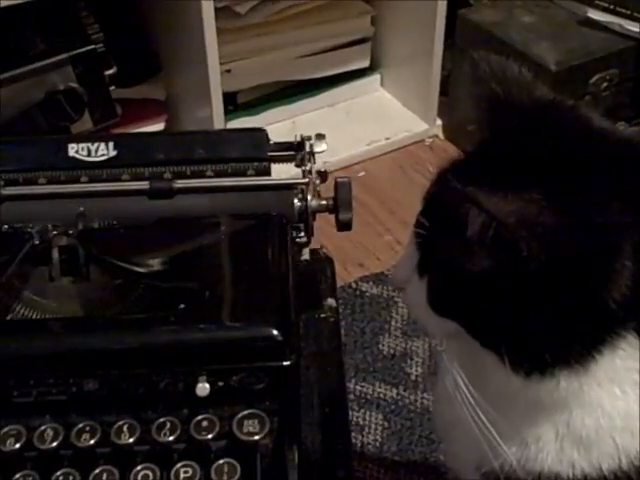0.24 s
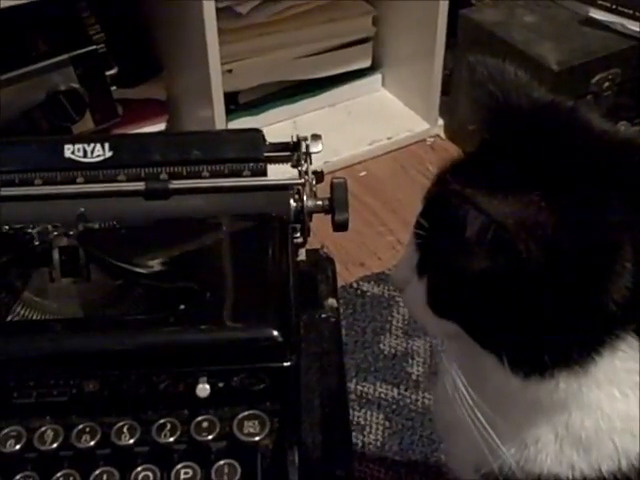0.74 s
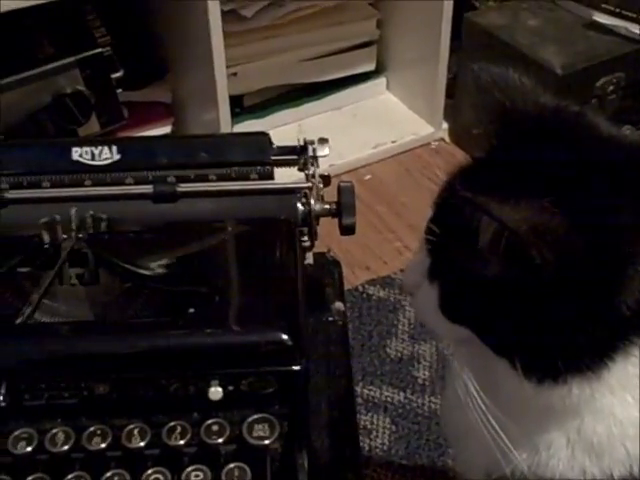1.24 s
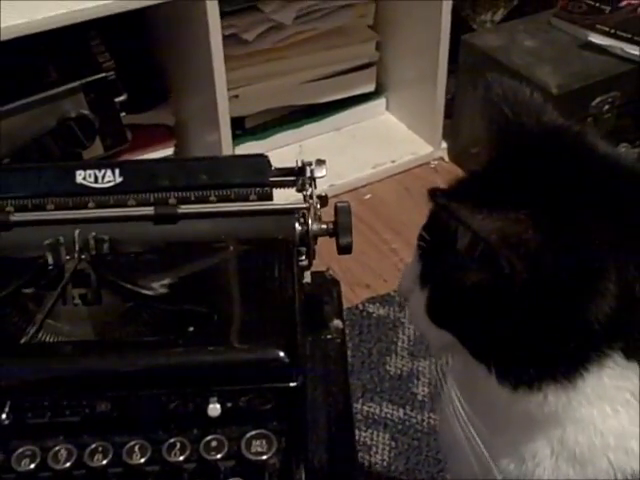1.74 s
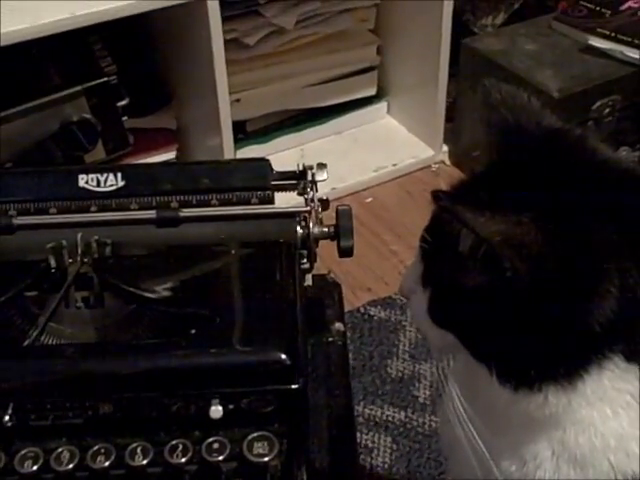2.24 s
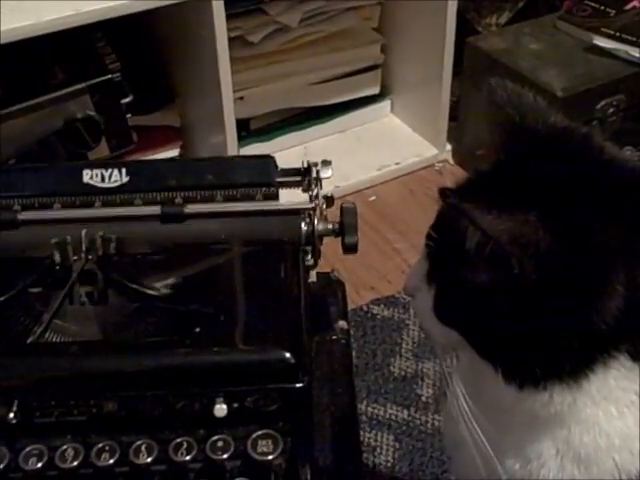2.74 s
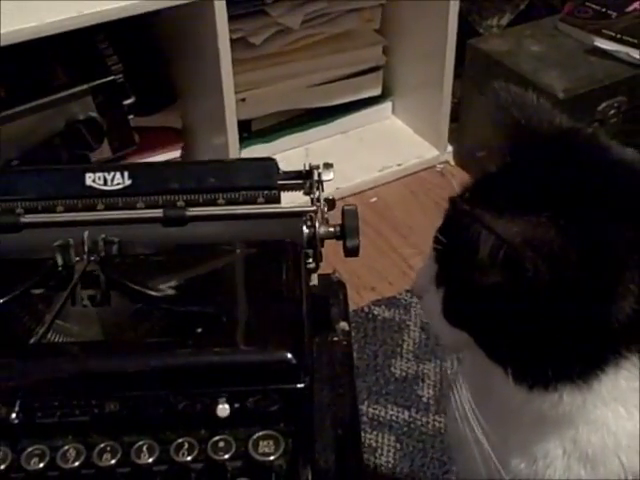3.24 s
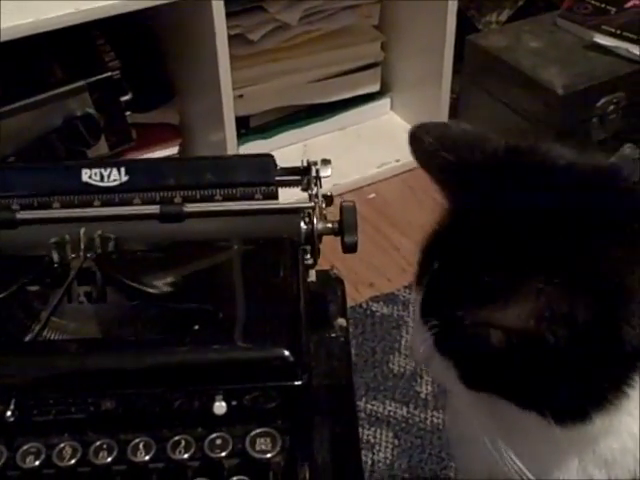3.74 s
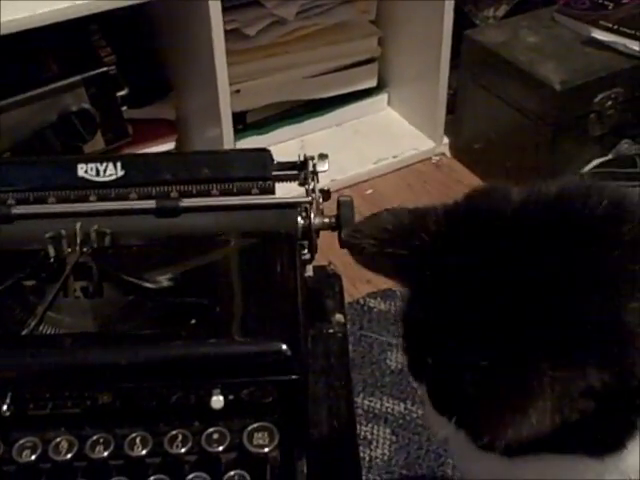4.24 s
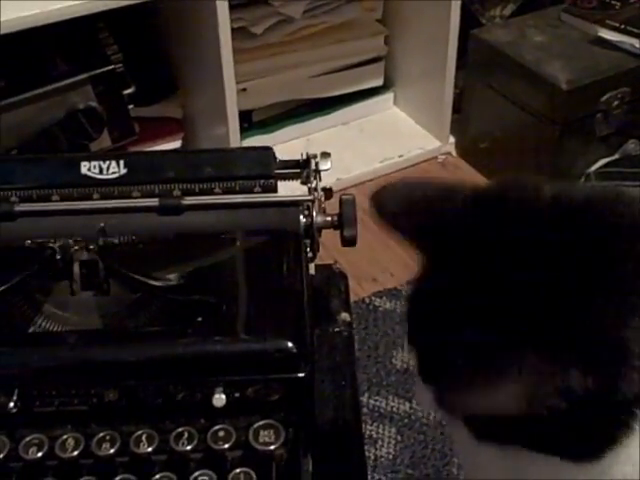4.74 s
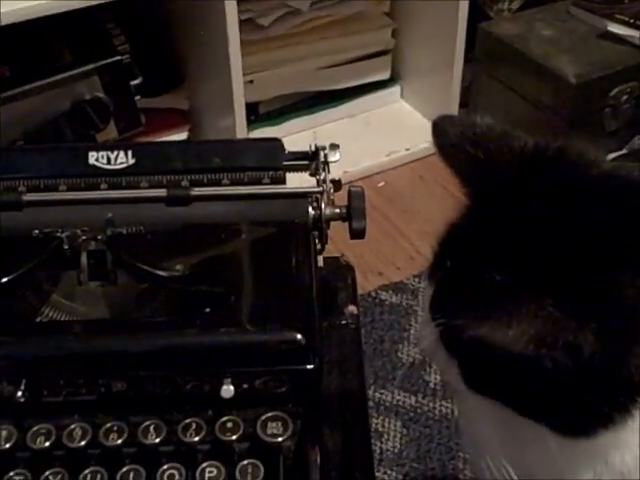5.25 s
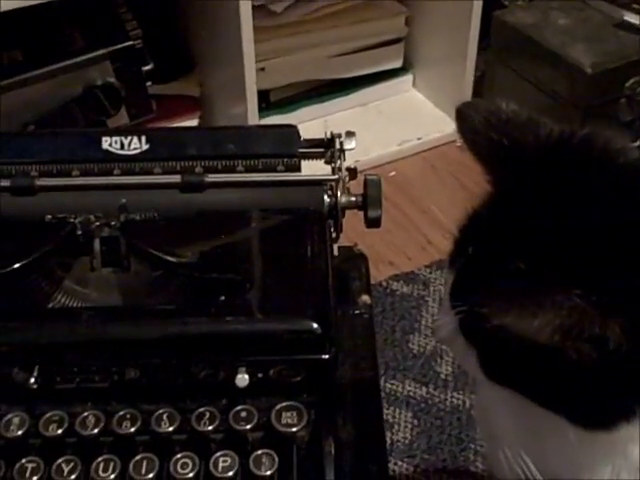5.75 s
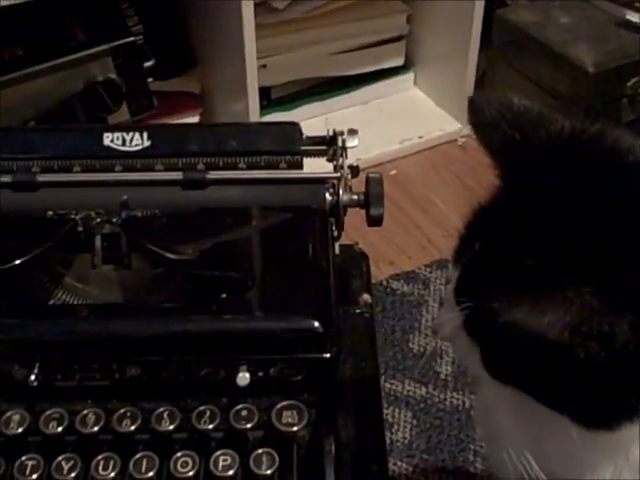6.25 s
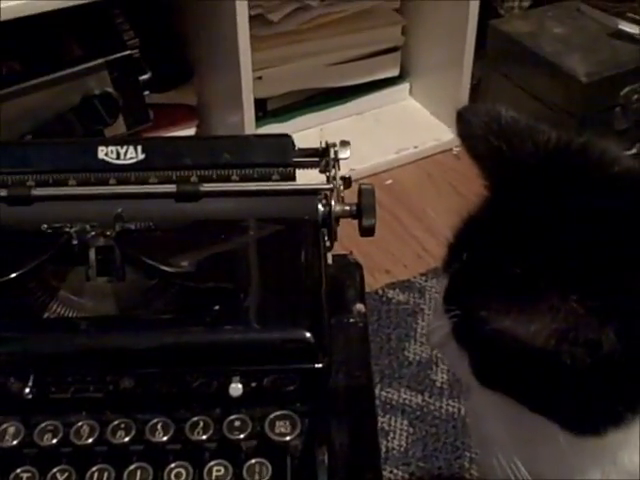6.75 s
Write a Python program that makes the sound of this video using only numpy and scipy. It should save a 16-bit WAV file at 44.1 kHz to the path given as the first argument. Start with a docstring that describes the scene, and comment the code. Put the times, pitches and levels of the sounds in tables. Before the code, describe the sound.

Close-up typewriter: quick hard metallic type slaps, a pause, irregular clattering half-strokes with dull thumps, faint cloth rustle, and a final bright rattle.

```python
"""The floor of a small, quiet room, where an old manual typewriter is pecked at with one hand.
Full strokes slap a type slug on the platen (noise bursts) and leave the steel ringing (fading sines);
half strokes only set the levers and type bars clattering (showers of tiny noisy contacts).
Each stroke thumps the frame into the floor; keys tap, springs ping, and a sleeve rustles in the pause.
Behind it all lie a steady hiss, a faint thin whine and soft low bumps."""
import sys
import numpy as np
from scipy import signal
from scipy.fft import rfft, irfft
from scipy.io import wavfile

SR = 44100
rng = np.random.default_rng(int(sys.argv[2]) if len(sys.argv) > 2 else 0)


def inscribe(sig):
    """Save sig as 16-bit PCM at rate SR to the path in sys.argv[1].

    A 1-D sig is mono; a 2-D sig holds one channel per row.
    Samples are clipped to [-1, 1] before scaling.
    """
    pcm = np.round(np.clip(np.atleast_2d(sig).T, -1, 1) * 32767)
    wavfile.write(sys.argv[1], SR, pcm.astype(np.int16))


N = 308259
TIME = np.arange(N) / SR  # the whole scene, in seconds
AGE = TIME[:SR // 2]  # seconds since the start of one short sound
CUTOFF_HZ = 16100

# In the tables, fade_s is the time to fade by 60 dB, and a tilt above zero makes a sound brighter.
# Levels are relative: the functions that play them add levels of their own.


def from_db(db):
    """Turn decibels into a gain."""
    return 10 ** (np.asarray(db) / 20)


def fade(age, fade_s):
    """Exponential decay by a factor of a thousand (60 dB) in fade_s."""
    return np.exp(-np.log(1000) * age / max(fade_s, 1e-3))


def at_hz(points, hz):
    """Read a table between its points, with pitch on a logarithmic scale."""
    log_points = [(np.log(f), value) for f, value in points]
    return np.interp(np.log(hz), *np.transpose(log_points))


def add(out, start_s, sound):
    """Mix a sound in at the given time."""
    i = np.clip(round(start_s * SR), 0, N)
    out[i:i + len(sound)] += sound[:N - i]


def colour(x, spectrum, tilt=0, size=4096):
    """Filter without pre-echo to a spectrum, tilted in dB per octave; white noise keeps its level."""
    hz = np.maximum(np.arange(size // 2 + 1) * SR / size, 1)
    octaves = np.log2(np.maximum(hz, spectrum[0][0]))
    gain = from_db(at_hz(spectrum, hz) + tilt * octaves)
    gain = gain / np.sqrt(np.mean(gain ** 2 * (hz < CUTOFF_HZ)))
    # folding the cepstrum (spectrum of the log gain) puts the filter's energy as early as possible
    cepstrum = irfft(np.log(gain))[:size // 2]
    cepstrum[1:] *= 2
    impulse = irfft(np.exp(rfft(cepstrum, size)))
    return signal.fftconvolve(x, impulse)[:len(x)]


def grains(per_s, spread_db, count):
    """Random contacts of uneven strength and either sign, scaled to an rms of 1."""
    hits = rng.random(count) < per_s / SR
    strength = from_db(spread_db * rng.standard_normal(count))
    x = hits * strength * rng.choice([-1, 1], count)
    return x / np.sqrt(np.mean(x ** 2) + 1e-18)


def ring(modes, uneven_db=0):
    """One blow on a set of modes: fading sines, each weakened at random by up to twice uneven_db."""
    out = 0
    for k, (hz, db, fade_s) in enumerate(modes):
        strength = from_db(db + uneven_db * (2 * rng.random() - 2))
        out = out + (-1) ** k * strength * fade(AGE, fade_s) * np.sin(2 * np.pi * hz * AGE)
    return out


def crack(fade_s):
    """A hard contact: fading noise stands for countless close modes that die together."""
    return rng.standard_normal(len(AGE)) * fade(AGE, fade_s)


def resonance(x, hz, width_hz):
    """Two-pole resonator that stresses one pitch, with gain 1 at its peak."""
    r = np.exp(-np.pi * width_hz / SR)
    feedback = [1, -2 * r * np.cos(2 * np.pi * hz / SR), r * r]
    return signal.lfilter(np.array([1, 0, -1]) * (1 - r * r) / 2, feedback, x)


# how fast the room's reflections die at each pitch: pitch_hz, fade_s
ROOM_FADE = [(100, 0.18), (700, 0.35), (3000, .21), (8000, .19), (16000, 0.18)]


def room(x, build_s=0.0017):
    """Dense reflections build up within milliseconds; each band of noise has its own decay."""
    edges = np.geomspace(40, 18000, 13)
    tail = np.zeros(len(AGE))
    for low, high in zip(edges, edges[1:]):
        band = signal.butter(2, [low, high], "band", fs=SR, output="sos")
        fade_s = at_hz(ROOM_FADE, np.sqrt(low * high))
        tail += signal.sosfilt(band, crack(fade_s))
    tail *= 1 - np.exp(-AGE / build_s)
    return signal.fftconvolve(x, tail / np.sqrt(np.sum(tail ** 2)))[:N]


# spectrum of the steady hiss: pitch_hz, level_db
AIR_COLOUR = [(12, -35), (20, 2), (60, -1.5), (177, -2.5), (513, -10.5), (607, -10.5), (923, -14.5),
              (1220, -14), (3530, -21.5), (10200, -24), (13500, -25), (14700, -24.5), (16000, -26.5)]
# spectrum of the soft bumps: pitch_hz, level_db
BUMP_COLOUR = [(25, 5.5), (90, 3), (240, -3), (500, -7.5), (900, -19.5), (2400, -21.5), (4000, -34)]
AIR_DB = -64
# average gap between bumps, their middle level and how far it strays either way
BUMP_GAP_S, BUMP_DB, BUMP_SPREAD_DB = .11, -49.5, 1.5


def background(bump_fade_s=0.064, rise_s=0.0037, whine_hz=15420, whine_db=-60):
    """Steady hiss with a faint, thin whine from a narrow resonance, and soft bumps at uneven moments."""
    bumps = np.zeros(N)
    shape = (1 - np.exp(-AGE / rise_s)) * fade(AGE, bump_fade_s)
    for k, (late, strength) in enumerate(rng.uniform(-1.03, 1, size=(120, 2))):
        start_s = BUMP_GAP_S * (k + .5 * late)
        if start_s < TIME[-1]:
            add(bumps, start_s, from_db(BUMP_DB + BUMP_SPREAD_DB * strength) * shape)
    hiss = from_db(AIR_DB) * colour(rng.standard_normal(N), AIR_COLOUR)
    # whine_db sets the noise around the resonance, which lets only a narrow part through
    whine = from_db(whine_db) * resonance(rng.standard_normal(N), whine_hz, 60)
    return colour(bumps * rng.standard_normal(N), BUMP_COLOUR) + hiss + whine


# slides of the cloth: start_s, length_s, level_db
SLIDES = [(5.209, 0.39, -64), (5.569, 0.21, -60), (5.725, 0.21, -65), (6.358, .15, -59.5)]
# spectrum of the rustle: pitch_hz, level_db
SLEEVE_COLOUR = [(500, -21.5), (1800, -4), (2700, 3), (4500, -0.5), (9000, -4.5), (16000, -3)]
SLEEVE_FADE_S = 0.064


def sleeve():
    """Fibres catch and slip in a fine, dense hiss that fades in and out with each slide."""
    speed = np.zeros(N)
    for start_s, length_s, db in SLIDES:
        to_nearest_end_s = np.minimum(TIME - start_s, start_s + length_s - TIME)
        speed += from_db(db) * np.clip(to_nearest_end_s / SLEEVE_FADE_S, 0, 1)
    return speed * colour(grains(12000, 2.8, N), SLEEVE_COLOUR)


# hum of the side panel: pitch_hz, level_db, fade_s
PANEL = [(686, -2, 0.36), (822, -13.5, .3)]


def panel(level_db=-37, follow=0.35):
    """Even a light push sets the side panel humming; its level follows only part of the push's."""
    out = np.zeros(N)
    for start_s, db, *_ in landings() + STRIKES:
        add(out, start_s, from_db(level_db + follow * db) * ring(PANEL, uneven_db=3.5))
    return out


# the escapement spring is flicked on its own: start_s, level_db
PINGS = [(0.028, -27), (0.324, -30), (0.56, -36), (0.577, -35), (0.637, -43), (0.666, -34.5)]
# ring of the escapement spring: pitch_hz, level_db, fade_s
SPRING = [(4490, -6.5, 0.077), (4630, -7, 0.078), (5000, 1.5, 0.032)]
# ring of a thinner spring: pitch_hz, level_db, fade_s
THIN_SPRING = [(7047, -5, .5), (4587, -13, 0.25)]
# a full stroke trips the escapement just before its slug lands: time ahead, level
TRIP_S, TRIP_DB = 0.0094, -28.5


def springs(ping_db=-5.0, thin_db=-50):
    """The escapement spring pings, also ahead of every slug; a thinner one sings after the last stroke."""
    out = np.zeros(N)
    trips = [(start_s - TRIP_S, TRIP_DB) for start_s, *_ in STRIKES]
    for start_s, db in PINGS + trips:
        add(out, start_s, from_db(db + ping_db) * ring(SPRING, uneven_db=1.0))
    add(out, 6.965, from_db(thin_db) * ring(THIN_SPRING))
    return out


# loose links touch: start_s, level_db, tilt_db_per_octave
TICKS = [(0.668, -37, 0.5), (0.689, -30, 3), (0.715, -19.5, 6), (0.8617, -43, 0), (1.075, -45, -1.5),
         (1.1174, -45, -2), (2.804, -42.5, -4), (2.8162, -39, -13), (3.43, -31, -0.5), (4.007, -33.5, 3),
         (4.585, -42.5, -1), (4.701, -11.5, 16), (6.8214, -45.5, -3)]
# spectrum of a tick: pitch_hz, level_db
TICK_COLOUR = [(300, -28.5), (1000, -9.5), (2500, -4.5), (4800, -2.5), (8000, -1.5), (16000, -4.5)]
# after every push the type bar drops back and bounces: after_peak_s, level_db
REBOUNDS = [(.076, -33.5), (.117, -41)]
REBOUND_TILT_DB = -0.5  # per octave
# share of a push's strength that its rebounds follow, and the push that the rebound levels hold for
REBOUND_FOLLOWS, USUAL_PUSH_DB = .55, -26.5


def ticks(level_db=-11.5, bounce_db=-3.5):
    """A loose link or falling type bar touches, bounces once milliseconds later and rings briefly."""
    fade_s, bounce_s = .04, (.002, .007)
    out = np.zeros(N)
    rebounds = []
    for peak_s, push_db, *_ in landings():
        stronger_db = REBOUND_FOLLOWS * (push_db - USUAL_PUSH_DB)
        rebounds += [(peak_s + after_s, db + stronger_db, REBOUND_TILT_DB) for after_s, db in REBOUNDS]
    for start_s, db, tilt in TICKS + rebounds:
        for late_s, rel_db in (0, 0), (rng.uniform(*bounce_s), bounce_db):
            tick = colour(crack(fade_s), TICK_COLOUR, tilt)
            add(out, start_s + late_s, from_db(db + level_db + rel_db) * tick)
    return out


# a key lever knocks against its stop: start_s, level_db, tilt_db_per_octave, lever_pitch_hz
TAPS = [(2.766, -35.5, 0.5, 1920), (3.1599, -25, 3, 1850), (3.168, -22, -2, 1270), (3.3168, -31, 4.5, 1470),
        (3.639, -16, 6.5, 2010), (3.646, -20, 5, 3100), (3.791, -32, 0, 1480), (3.894, -10.5, 8.5, 2890),
        (4.056, -50, 6, 1590), (4.2564, -37, 1, 2044), (6.751, -35, 0, 2932), (6.8713, -14.5, 10.5, 2930)]
# spectrum of the knock: pitch_hz, level_db
TAP_COLOUR = [(410, -15), (700, -2), (1620, -1), (2300, -5.5), (3030, 3), (4260, -6), (8530, -10.5),
              (9730, -22), (12300, -14.5), (16000, -36)]


def taps(fade_s=0.052, lever_db=1.0, level_db=-8.5):
    """A hollow knock, coloured by the ring of the lever that made it."""
    lever_width_hz = 220
    out = np.zeros(N)
    for start_s, db, tilt, lever_hz in TAPS:
        knock = colour(crack(fade_s), TAP_COLOUR, tilt)
        lever = from_db(lever_db) * resonance(knock, lever_hz, lever_width_hz)
        add(out, start_s, from_db(db + level_db) * (knock + lever))
    return out


# boom of floor and panels: pitch_hz, level_db, fade_s
FLOOR_MODES = [(116.6, -7, 0.12), (143.1, -6, 0.29), (158.1, -6.5, 0.19), (195.5, -15.5, 0.28),
               (208, -14, 0.13), (266, -10.5, 0.16), (293, -14, 0.25), (382, -14.5, 0.22), (666, -20, 0.28),
               (732, -22, 0.18), (850, -21.5, 0.18)]
# rocking of the frame on its feet: pitch_hz, level_db, fade_s
FEET_MODES = [(47.43, -11.5, 0.42), (76.3, -1, 0.44), (92, -8, .2)]
# spectrum of the dull thud: pitch_hz, level_db
THUD_COLOUR = [(25, -26), (70, -4), (150, 1), (260, -6.5), (450, -18), (900, -26), (2000, -55)]
GIVE_S = .005  # the frame gives way this long before a key bottoms out
# thump and rocking when a full stroke jolts the frame
JOLT_DB, JOLT_ROCK_DB = -42.5, -55


def thumps(modes_db=0.0, thud_db=-3.5, feet_db=4.0, thud_fade_s=.17, push_s=0.0039, rock_s=0.0151):
    """Floor and panels boom quickly with a dull thud; the heavy frame takes longer to rock on its feet."""
    out = np.zeros(N)
    push = 1 - np.exp(-AGE / push_s)
    rock = 1 - np.exp(-AGE / rock_s)
    blows = [(peak_s - GIVE_S, db, rocking_db) for peak_s, _, db, rocking_db in landings()]
    blows += [(start_s, JOLT_DB, JOLT_ROCK_DB) for start_s, *_ in STRIKES]
    for start_s, db, rocking_db in blows:
        boom = from_db(db + modes_db) * ring(FLOOR_MODES)
        thud = from_db(db + thud_db) * colour(crack(thud_fade_s), THUD_COLOUR)
        rocking = from_db(rocking_db + feet_db) * ring(FEET_MODES)
        add(out, start_s, push * (boom + thud) + rock * rocking)
    return out


# resonances of the type basket: pitch_hz, width_hz, level_db
BASKET = [(686, 21, 8), (2890, 220, -3), (4500, 80, 0.5), (4700, 60, -1), (4900, 91, -2), (5870, 40, -5.5),
          (6600, 160, -4), (8210, 110, -1.5), (9900, 400, -4.5)]


def basket(x, share_db):
    """The type basket adds its resonances to whatever rattles in it."""
    resonances = [from_db(db + share_db) * resonance(x, hz, width_hz) for hz, width_hz, db in BASKET]
    return x + sum(resonances)


# spectrum of the clatter: pitch_hz, level_db
CLATTER_COLOUR = [(150, -25), (250, -2), (452, -13), (576, -6), (686, -2.5), (906, -13.5), (1310, -9.5),
                  (2860, -7), (3460, -8), (3840, -5.5), (6250, -5), (8550, -4.5), (10400, -7.5),
                  (14200, -1.5), (16000, -12.5)]


def shower(first_db, peak_db, swell_s, fade_s, tilt):
    """Small steel contacts swell from one level to another and die as the parts settle."""
    per_s, contact_fade_s, spread_db = 2200, .008, 4.0
    dying = fade(AGE, contact_fade_s) ** 2
    swell = from_db(np.interp(AGE, [0, swell_s], [first_db, peak_db]))
    force = swell * fade(np.maximum(AGE - swell_s, 0), fade_s)
    contacts = grains(per_s, spread_db, len(AGE)) ** 2
    # the first contact falls on the onset; every contact rings for a moment
    energy = dying + np.abs(signal.fftconvolve(contacts, dying / dying.sum())[:len(AGE)])
    return colour(force * np.sqrt(energy) * rng.standard_normal(len(AGE)), CLATTER_COLOUR, tilt)


# a key is pushed and the levers clatter: start_s, take_up_db, first_db, peak_db, push_s, fade_s,
# tilt_db_per_octave, thump_db, rocking_db
STROKES = [ (0.020, -35.5, -47, -34, 0.0099, 0.53, 1, -36, -42),
           (0.07, -39, -53, -42, 0.0082, 0.12, 0, -41.5, -38.5),
           (0.185, -54.5, -37, -33.5, 0.014, 0.25, -1, -39.5, -39.5),
           (0.321, -46, -33.5, -34.5, .012, 0.31, -0.45, -38, -35.5),
           (0.482, -47, -43.5, -33, 0.013, 0.2, -0.8, -37.5, -34.5),
           (0.699, -50, -41.5, -34, .015, 0.097, -0.7, -44, -60),
           (2.863, -49.5, -44, -27.5, .02, .11, 1, -31, -46),
           (3.16, -55.5, -20, -20, .012, 0.1, -0.5, -24.5, -36.5),
           (3.453, -52.5, -46.5, -30.5, 0.014, .11, 0, -33.5, -41.5),
           (3.6367, -62, -30, -27.5, .012, .1, -1, -26.5, -35.5),
           (3.884, -38, -23.5, -22, .014, 0.14, 0.4, -28.5, -40),
           (4.0539, -60.5, -23.5, -27.5, 0.0096, 0.13, -1, -27, -36),
           (4.652, -62, -49.5, -34, .02, 0.26, -1.1, -38.5, -39),
           (4.689, -56.5, -36, -26.5, .015, 0.081, 0.2, -38.5, -38.5),
           (6.871, -58, -20.5, -20.5, .004, .12, 1, -47, -43),
           (6.886, -69, -17.5, -15.5, 0.0092, 0.12, 1.15, -32, -33.5)]
# before the push the finger takes up the slack in the linkage; tilt is per octave
TAKE_UP_S, TAKE_UP_FROM_DB, TAKE_UP_FADE_S, TAKE_UP_TILT_DB = .033, -57, 0.064, -2.5
# in a full stroke the type bar rattles on its way up; tilt is per octave
SWING_DB, SWING_FADE_S, SWING_TILT_DB = -39, .22, -1.27


def landings():
    """Each key bottoms out at the end of its push: peak_s, clatter_db, thump_db, rocking_db."""
    return [(start_s + push_s, peak_db, thump_db, rocking_db)
            for start_s, _, _, peak_db, push_s, _, _, thump_db, rocking_db in STROKES]


def clatter(level_db=0.0):
    """The linkage stirs, then clatters as the key goes down; type bars rattle on their way to the platen."""
    out = np.zeros(N)
    for start_s, take_up_db, first_db, peak_db, push_s, fade_s, tilt, *_ in STROKES:
        stir = shower(TAKE_UP_FROM_DB, take_up_db, TAKE_UP_S, TAKE_UP_FADE_S, TAKE_UP_TILT_DB)
        add(out, start_s - TAKE_UP_S, stir)
        add(out, start_s, shower(first_db, peak_db, push_s, fade_s, tilt))
    for start_s, *_, swing_s in STRIKES:
        add(out, start_s - swing_s, shower(SWING_DB, SWING_DB, swing_s, SWING_FADE_S, SWING_TILT_DB))
    return from_db(level_db) * out


# a type slug hits the platen, after its type bar has swung up for swing_s:
# start_s, level_db, fade_s, tilt_db_per_octave, steel_ring_db, swing_s
STRIKES = [(0.1122, -10, 0.027, 0.5, -56.5, .018), (0.269, -14, 0.023, 0.6, -50, 0.019),
           (0.4186, -12, 0.028, 1.2, -54, .022), (1.1715, -7.5, 0.038, 1.4, -49.5, 0.027)]
# spectrum of the slap: pitch_hz, level_db
STRIKE_COLOUR = [(120, -42.5), (200, -11.5), (456, -21), (735, -10), (1500, -9), (3490, -3), (4430, 3),
                 (5330, -4.5), (5730, -1), (6170, -3), (9230, -1.5), (11100, -5), (16000, -5.5)]
# ring of the steel: pitch_hz, level_db, fade_s
STEEL = [(2540, -16, 0.66), (2820, -13, .75), (3500, -6, 0.44), (4530, -9.5, .45), (5300, -7, .42),
         (6420, -2.5, 0.57), (8700, -1.5, 0.3), (8538, -3.5, 0.29), (10500, 2, .22)]


def strikes(snap_db=0.0, snap_fade_s=0.0055):
    """The slug snaps on the platen, the bar shudders, and the steel rings on."""
    out = np.zeros(N)
    for start_s, db, fade_s, tilt, ring_db, _ in STRIKES:
        shudder = crack(fade_s)
        snap = from_db(snap_db) * crack(snap_fade_s)
        add(out, start_s, from_db(db) * colour(shudder + snap, STRIKE_COLOUR, tilt))
        add(out, start_s, from_db(ring_db) * ring(STEEL))
    return out


def scene():
    """The machine close by, its reflections, and the quiet around it."""
    quiet = background() + sleeve()
    pings, keys, body = springs(), taps(), thumps()
    levers = basket(clatter() + ticks(), share_db=-4.5)
    slugs = basket(strikes(), share_db=-2.5)
    to_room = from_db(-15.5) * slugs + from_db(-13.0) * (levers + pings)
    to_room += from_db(-12.0) * keys + from_db(-11) * body
    machine = slugs + levers + keys + body + pings + panel()
    return (machine + room(to_room) + quiet)[None]


def record(dry):
    """The loudest peaks are rounded and the top of the treble is cut."""
    rounded = 1.3 * np.tanh(dry / 1.3)
    low_pass = signal.ellip(10, .2, 80, CUTOFF_HZ, fs=SR, output="sos")
    return signal.sosfilt(low_pass, rounded)


dry = scene()
out = record(dry)
inscribe(out)
```